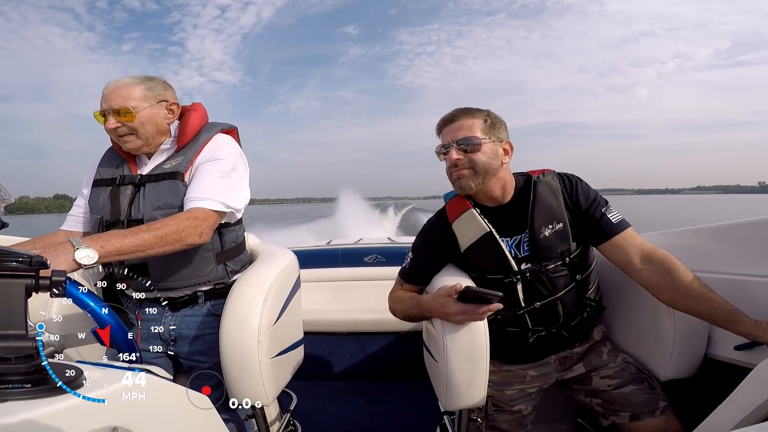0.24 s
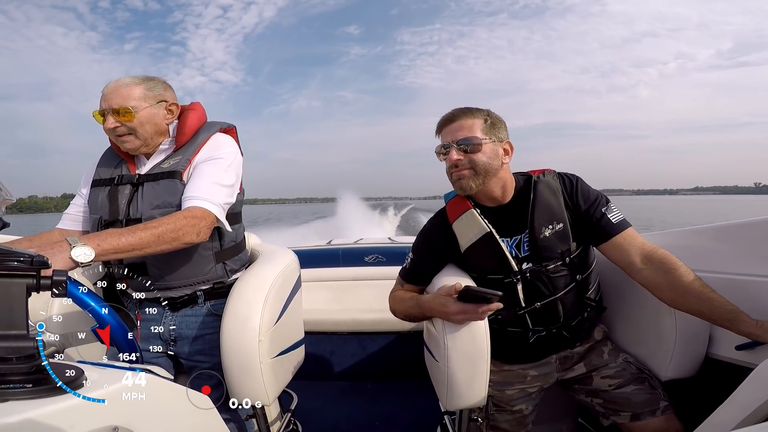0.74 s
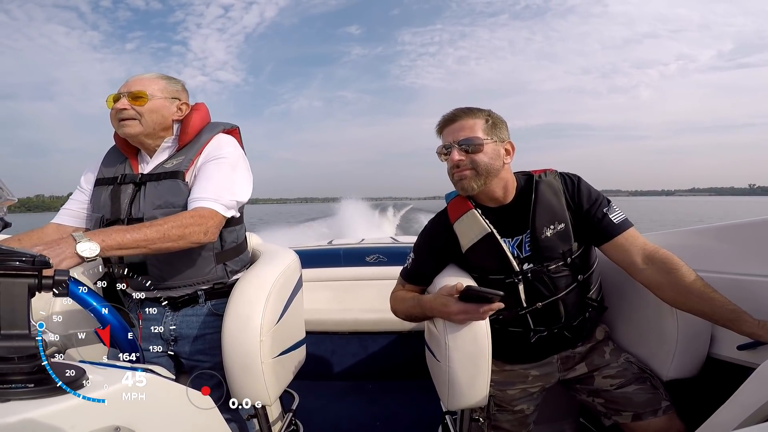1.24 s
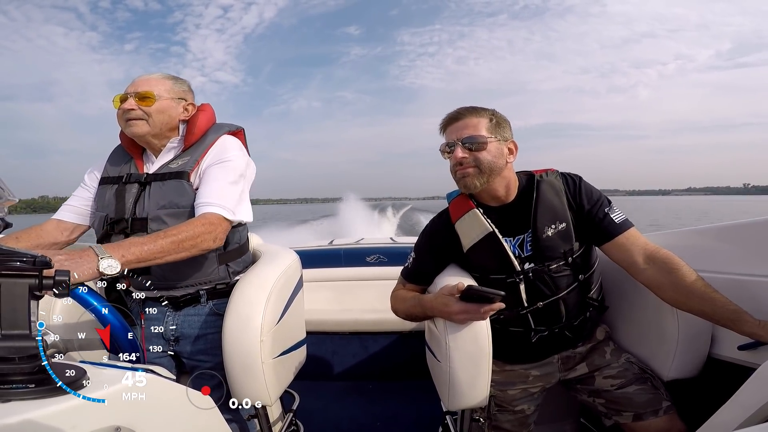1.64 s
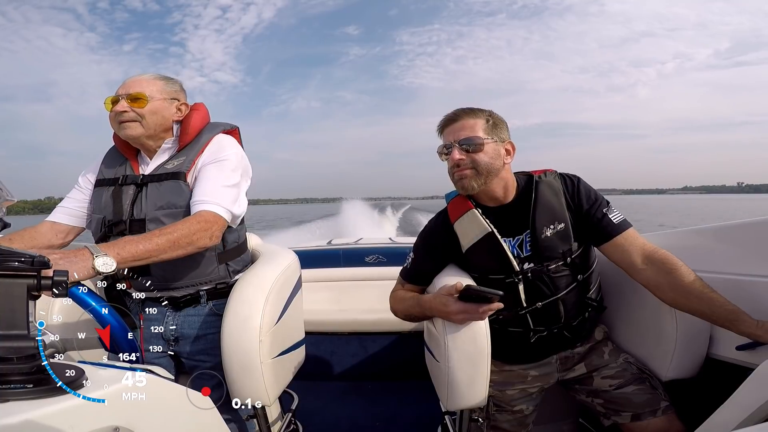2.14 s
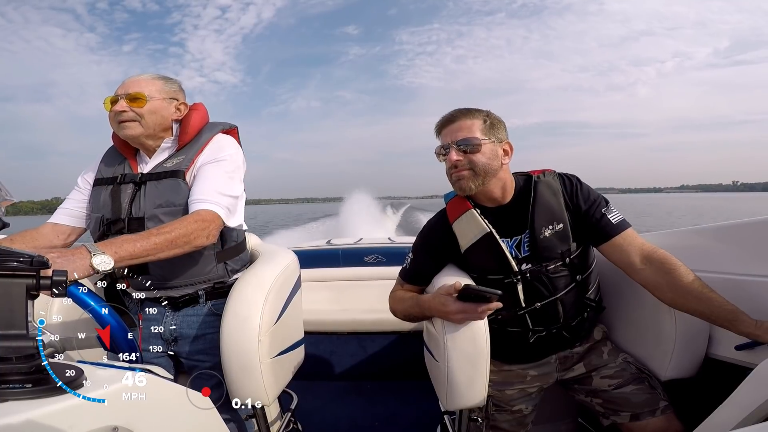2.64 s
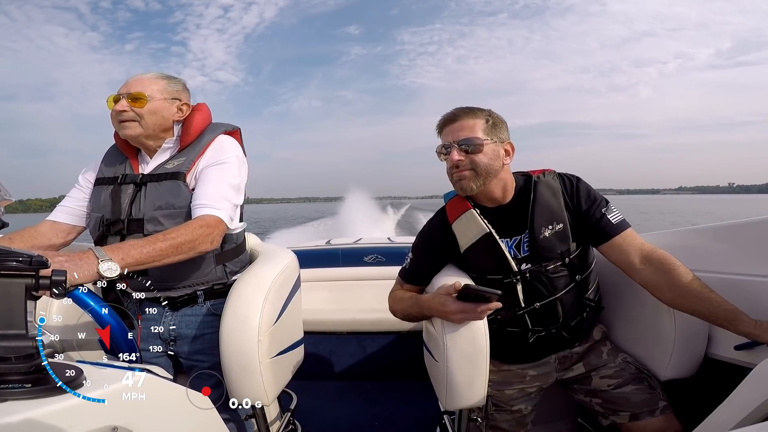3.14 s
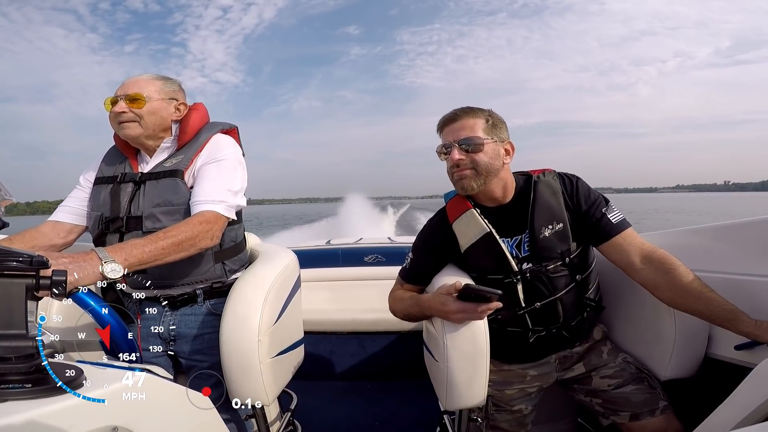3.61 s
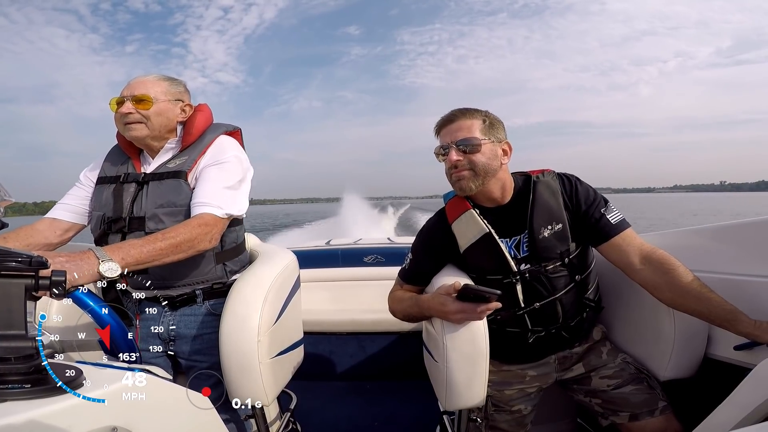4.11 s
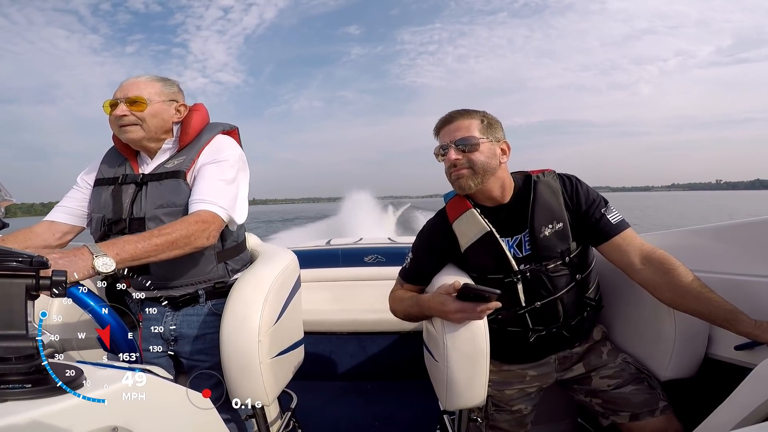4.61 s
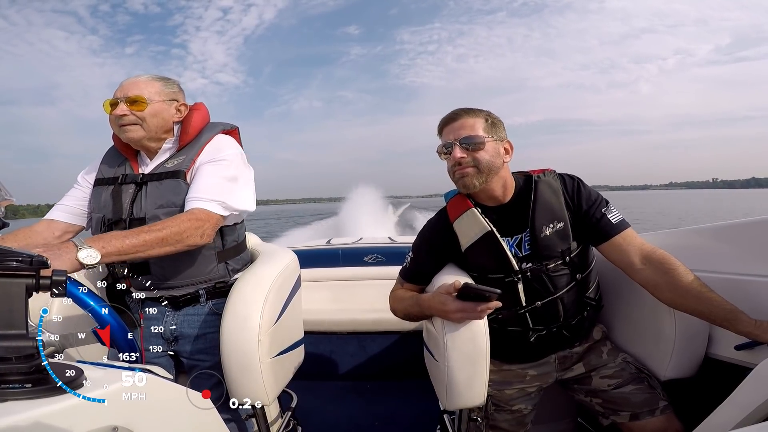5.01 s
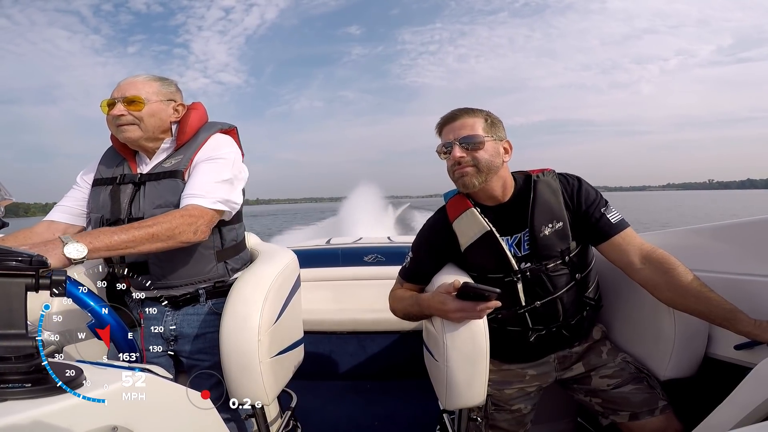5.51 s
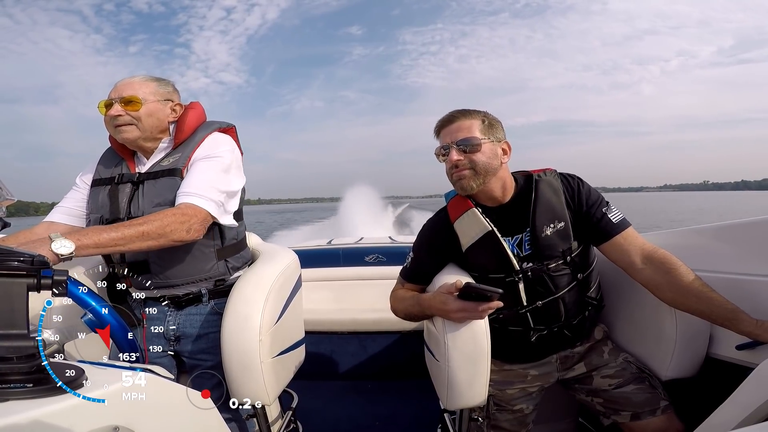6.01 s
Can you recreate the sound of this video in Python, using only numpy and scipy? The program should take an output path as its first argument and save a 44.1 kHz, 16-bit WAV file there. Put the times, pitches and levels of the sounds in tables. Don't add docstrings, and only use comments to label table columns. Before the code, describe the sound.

Loud, steady throaty boat engine at high speed, climbing in two throttle steps, with low wind buffeting and fine water hiss, heard from on board.

```python
import sys
import numpy as np
from scipy import signal
from scipy.io import wavfile
from scipy.ndimage import uniform_filter1d, minimum_filter1d

SR = 44100
rng = np.random.default_rng(int(sys.argv[2]) if len(sys.argv) > 2 else 0)


def inscribe(sig):
    pcm = np.round(np.clip(np.atleast_2d(sig).T, -1, 1) * 32767)
    wavfile.write(sys.argv[1], SR, pcm.astype(np.int16))


def gain_from_decibels(decibels):
    exponent = np.asarray(decibels, float) / 20
    return 10 ** exponent


N = 276066
TIME = np.arange(N) / SR
GRID = 64

OVERTONES = list(range(17, 49))
WHINES = [50, 64, 13.29, 113.6]


def evened(x):
    return x / np.sqrt(np.mean(x ** 2) + 1e-20)


def curves(rows):
    start_s, *columns = np.transpose(rows)
    return [np.interp(TIME, start_s, column) for column in columns]


def read_spectrum(points, hz):
    point_hz, level_db = np.transpose(points)
    return np.interp(np.log(hz + 1), np.log(point_hz + 1), level_db)


def resonances(modes, hz):
    return sum(lift_db / (1 + (2 * (hz - mode_hz) / width_hz) ** 2) for mode_hz, width_hz, lift_db in modes)


def wander(rate_hz, count):
    frames = N // GRID + 2
    z = rng.standard_normal((count, frames)) + 1j * rng.standard_normal((count, frames))
    hz = np.fft.fftfreq(frames, GRID / SR)
    z = np.fft.ifft(z / (1 + (hz / rate_hz) ** 2), axis=1)
    return z / np.sqrt(np.mean(abs(z) ** 2, 1, keepdims=True))


def engine_speed():
    # start_s, cycle_hz
    speed_rows = [(0.0, 26.75), (0.26, 26.5), (0.68, 26.3), (1.1, 26.55), (1.3, 26.36), (1.56, 26.72),
                  (1.79, 26.9), (2.0, 28.33), (2.4, 28.67), (2.75, 28.6), (3.0, 28.38), (3.45, 28.27),
                  (3.65, 28.68), (4.13, 28.84), (4.35, 31.1), (4.6, 32.2), (5.5, 33.1), (6.26, 33.3)]
    return curves(speed_rows)[0]


def cycle_phase():
    return 2 * np.pi * np.cumsum(engine_speed()) / SR


def revs():
    speed = engine_speed()
    settle_s = 0.14
    memory = np.exp(-1 / (settle_s * SR))
    rise = speed - speed[0]
    return rise, signal.lfilter([1 - memory], [1, -memory], rise)


def on_grid(x):
    return x[np.minimum(np.arange(N // GRID + 2) * GRID, N - 1)]


def tones(multiples, level_db, slow, rough, rough_hz):
    count = len(multiples)
    cycle = cycle_phase()
    shake = 1 + slow * wander(1.9, count) + rough * wander(rough_hz, count)
    height = np.sqrt(2) * abs(shake) * gain_from_decibels(level_db)
    slip = np.unwrap(np.angle(shake), axis=1) + 2 * np.pi * rng.random((count, 1))
    slip = slip + 0.004 * np.outer(multiples, wander(12.0, 1).real)
    fine, coarse = np.arange(N) / GRID, np.arange(shake.shape[1])
    total = np.zeros(N)
    for multiple, h, p in zip(multiples, height, slip):
        total += np.interp(fine, coarse, h) * np.cos(multiple * cycle + np.interp(fine, coarse, p))
    return total


def noise(shape_db, size, patchy_db, flicker_db):
    hop = size // 4
    frames, hz = N // hop + 5, np.fft.rfftfreq(size, 1 / SR)
    real, imaginary, patches = rng.standard_normal((frames, len(hz), 3)).T
    patches = uniform_filter1d(patches, size=9, axis=0)
    patches = evened(uniform_filter1d(patches, size=9, axis=1))
    flicker = evened(uniform_filter1d(rng.standard_normal(frames), size=3))
    field_db = shape_db(hz[:, None], np.arange(frames) * hop / SR)
    field_db = field_db + patchy_db * patches + flicker_db * flicker
    spectra = (real + 1j * imaginary) * gain_from_decibels(field_db)
    return evened(signal.istft(spectra, nperseg=size, noverlap=size - hop)[1][:N])


def puffs(depth_firing, depth_crank):
    cycle = cycle_phase()
    return evened(1 + depth_firing * np.cos(8 * cycle) + depth_crank * np.cos(2 * cycle))


def hull_tones():
    strong_multiples = [2, 5, 8, 6.645]
    # start_s, load_db
    load_rows = [(0, 0.5), (.7, -0.4), (1.12, 1.5), (1.6, -0.2), (1.92, 3.2), (2.4, 0.5), (2.75, -0.2),
                 (2.95, 1.5), (3.25, -0.9), (3.52, 1.5), (4.05, -2.5), (4.4, -4.5), (5.1, -0.5),
                 (6.26, 1.5)]
    # pitch_hz, level_db
    crank_response = [(53, -34.5), (55, -32.5), (57, -27.5), (61, -27.5), (66, -18)]
    beat_response = [(132, -47.5), (141, -37), (145.5, -45), (153, -24), (162, -28.5), (166, -28.5)]
    firing_response = [(212, -16.8), (228, -18), (233, -19), (247, -28), (257, -35.5), (266, -33.5)]
    blade_response = [(176, -25), (189, -23.5), (205, -29), (215, -32), (220, -39.5)]
    speed, load_db = on_grid(engine_speed()), on_grid(curves(load_rows)[0])
    settled = speed[0] + on_grid(revs()[1])
    crank, beat, firing, blades = strong_multiples
    level_db = np.array([read_spectrum(crank_response, crank * settled) - load_db,
                         read_spectrum(beat_response, beat * speed),
                         read_spectrum(firing_response, firing * speed) + load_db,
                         read_spectrum(blade_response, blades * settled)])
    return tones(strong_multiples, level_db, slow=0.02, rough=0.05, rough_hz=25.0)


def overtones_db(speed, revs_hz):
    # pitch_hz, level_db
    weak_slope = [(450, -62.5), (600, -60), (800, -60.5), (1100, -63), (1500, -71.5)]
    cylinder_lifts = [3.5, 0, 1.9, -0.5, 1.5, -1.7, -0.5, -1.5]
    # multiple, resonance_hz, width_hz, top_db
    crossings = [(17, 548, 60, -42.5), (18, 515, 40, -48.5), (18, 597, 50, -43.5), (19, 545, 40, -48.5),
                 (19, 600, 50, -42), (20, 555, 90, -49.5), (21, 557, 40, -50.5), (23, 760, 50, -49.5),
                 (24, 640, 50, -51), (24, 770, 100, -44), (25, 815, 90, -47), (26, 695, 50, -53.5),
                 (26, 800, 70, -43), (28, 803, 60, -43), (32, 872, 30, -41), (33, 1085, 70, -52.5),
                 (34, 1120, 70, -51), (36, 995, 160, -51), (38, 1255, 60, -52), (39, 1290, 60, -49),
                 (40, 1255, 60, -50), (42, 1340, 140, -51), (44, 1385, 80, -51), (45, 1195, 60, -56),
                 (48, 1275, 60, -56.5), (50, 1410, 150, -54.5), (64, 2000, 90, -51), (64, 2125, 40, -57),
                 (13.29, 430, 60, -48), (113.6, 3025, 80, -64.5)]
    multiples = np.array([*OVERTONES, *WHINES])
    overtone_lift_db = np.array(cylinder_lifts)[np.array(OVERTONES) % len(cylinder_lifts)]
    lift_db = np.append(overtone_lift_db, np.full(len(WHINES), -14.5))
    slope_db = read_spectrum(weak_slope, np.outer(multiples, speed))
    energy = gain_from_decibels(slope_db + lift_db[:, None] + 0.93 * revs_hz) ** 2
    for multiple, hz, width_hz, top_db in crossings:
        detuning = 2 * (multiple * speed - hz) / width_hz
        energy[multiples == multiple] += (gain_from_decibels(top_db) / (1 + detuning ** 2)) ** 2
    return 10 * np.log10(energy)


def exhaust_tones():
    beat_multiples = [1, 3, 4, 6, 7, 9, 10, 11, 12, 13, 14, 15, 16]
    throttle_speeds = [26.7, 28.5, 31.4, 33]
    # cruise_db, first_step_db, climbing_db, second_step_db
    beat_levels = [(-56, -44.5, -42.5, -39.5), (-31, -32, -34, -32.5), (-39.5, -39, -40, -40),
                   (-39, -31.5, -31.5, -41.5), (-31.5, -36, -28, -34), (-34.5, -45, -44, -39),
                   (-40.5, -43, -50, -36), (-43.5, -52.5, -50, -48), (-41.5, -59.5, -46, -44.5),
                   (-46.5, -51.5, -46.5, -38.5), (-57.5, -51.5, -41.5, -49), (-52, -42.5, -49, -42),
                   (-45.5, -53, -49.5, -46)]
    speed = on_grid(engine_speed())
    beats_db = [np.interp(speed, throttle_speeds, row) for row in beat_levels]
    level_db = np.vstack([beats_db, overtones_db(speed, on_grid(revs()[0]))])
    multiples = [*beat_multiples, *OVERTONES, *WHINES]
    return tones(multiples, level_db, slow=0.15, rough=0.1, rough_hz=8.0)


def rumble():
    # pitch_hz, level_db
    rumble_spectrum = [(15, -19), (30, -8.5), (50, 2.5), (85, 2), (130, -1), (190, 0.5), (280, -10),
                       (400, -34), (1000, -110)]
    # centre_s, lift_db
    gust_rows = [(0, 5.5), (.32, 5.5), (1.0, -1), (2.4, 3), (2.92, 3), (3.12, 3.5), (3.32, 4.5), (3.68, -2),
                 (4.0, 5), (4.4, 3.5), (4.64, 6.5), (5.12, 0), (5.44, 3.5), (5.76, 5.5), (6.15, 8)]

    def shape_db(hz, s):
        return read_spectrum(rumble_spectrum, hz) + 0 * s

    lumps = noise(shape_db, size=2048, patchy_db=0.8, flicker_db=0.6)
    gust_s = 0.13
    gust_db = sum(lift_db * np.exp(-((TIME - centre_s) / gust_s) ** 2) for centre_s, lift_db in gust_rows)
    return gain_from_decibels(-31.5 + gust_db) * lumps


def roar():
    # pitch_hz, level_db
    roar_spectrum = [(100, -6.5), (200, -2), (300, 4.5), (450, -4.5), (600, -5), (720, -6.5), (1000, -13),
                     (1300, -10), (1600, -14), (2200, -17), (2800, -23), (3600, -28), (4500, -42.5),
                     (8000, -100)]
    # mode_hz, width_hz, lift_db
    pipe_modes = [(510, 93, 4), (810, 150, 4), (1120, 150, 3.5), (1412, 120, 6.5), (1866, 130, 6),
                  (2090, 110, 2.5), (2600, 38, 5), (3010, 130, 3)]
    # mode_hz, width_hz, lift_db
    intake_modes = [(3015, 45, 7.5), (2300, 900, 2)]
    # start_s, share (0-1)
    intake_rows = [
        (1.78, 1),
        (1.92, 0),
        (4.3, 0.08),
        (4.9, .6),
    ]

    def shape_db(hz, s):
        opened = np.interp(s, *np.transpose(intake_rows))
        intake_db = opened * resonances(intake_modes, hz)
        return read_spectrum(roar_spectrum, hz) + resonances(pipe_modes, hz) + intake_db

    gas = noise(shape_db, size=1024, patchy_db=0.42, flicker_db=0.14)
    level_db = -36.5 + 0.57 * revs()[0]
    return gain_from_decibels(level_db) * gas * puffs(0.16, 0.054)


def spray():
    # pitch_hz, level_db
    low_hull_spectrum = [(2600, -39), (3300, -23), (3730, -19.5), (4370, -10), (4900, -2), (5600, -5.5),
                         (6250, -1), (6900, -4.5), (7900, -15), (8800, -18), (10400, -28), (11500, -31.5),
                         (13200, -40.5), (14400, -54.5)]
    lifted_hull_spectrum = [(2600, -47.5), (3300, -22.5), (3600, -16), (4200, -8.5), (5000, 0),
                            (5600, -5.5), (6300, -2), (7000, -8), (7900, -14), (8800, -19), (10400, -27.5),
                            (11500, -32), (13200, -41), (14400, -57)]

    def shape_db(hz, s):
        lifted = np.interp(s, [1.78, 1.92], [0, 1])
        low_db = read_spectrum(low_hull_spectrum, hz)
        return (1 - lifted) * low_db + lifted * read_spectrum(lifted_hull_spectrum, hz)

    hiss = noise(shape_db, size=256, patchy_db=0.76, flicker_db=0.1)
    lift_drop_db = np.interp(TIME, [1.7, 1.92], [0, -6])
    level_db = -40.5 + lift_drop_db + 0.68 * revs()[1]
    return gain_from_decibels(level_db) * hiss * puffs(0.04, 0.06)


def whistle():
    # start_s, pitch_hz, level_db
    whistle_rows = [
        (4.2, 9580, -95),
        (4.24, 9750, -74),
        (4.3, 9950, -74),
        (4.34, 10000, -77),
        (4.38, 10100, -101.5),
    ]
    pitch_hz, level_db = curves(whistle_rows)
    return np.sqrt(2) * gain_from_decibels(level_db) * np.sin(2 * np.pi * np.cumsum(pitch_hz) / SR)


def scene():
    engine = hull_tones() + exhaust_tones()
    return (engine + rumble() + roar() + spray() + whistle())[None]


def low_pass(x):
    return signal.sosfilt(signal.butter(12, 14450, fs=SR, output="sos"), x)


def record(dry):
    power_db = 10 * np.log10(uniform_filter1d(dry[0] ** 2, size=1800) + 1e-12)
    slow_db = uniform_filter1d(power_db, size=20000)
    peak = -minimum_filter1d(-abs(dry[0]), size=301)
    peak_db = 20 * np.log10(peak + 1e-9)
    over_db = uniform_filter1d(np.maximum(peak_db + 10.0, 0), size=301)
    reduction_db = 0.072 * (power_db - slow_db) + 0.57 * over_db
    return low_pass(dry / gain_from_decibels(reduction_db))


dry = scene()
out = record(dry)
inscribe(out)
```